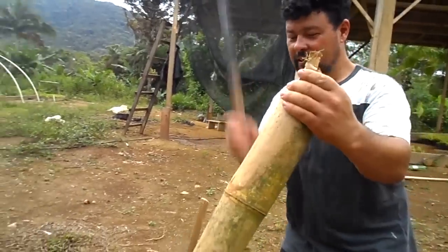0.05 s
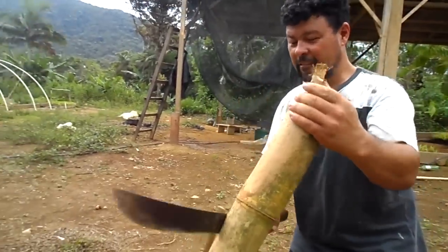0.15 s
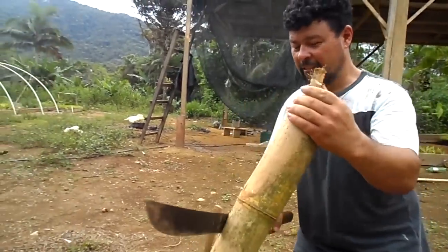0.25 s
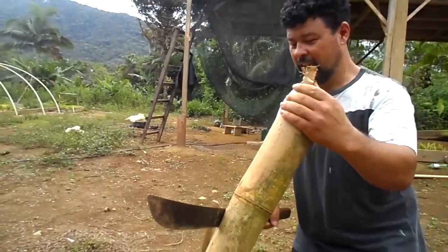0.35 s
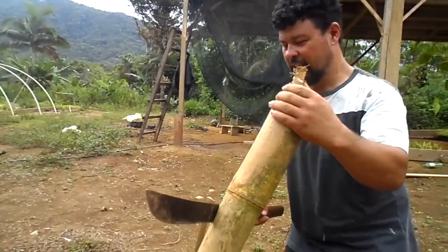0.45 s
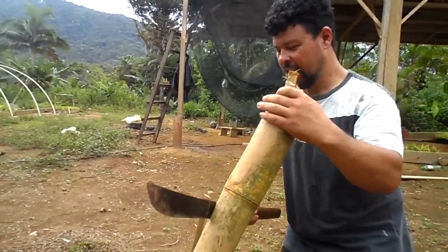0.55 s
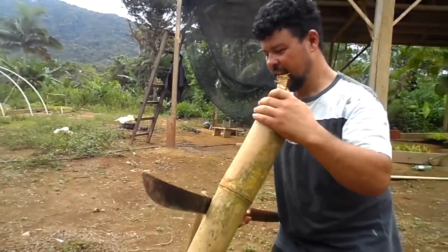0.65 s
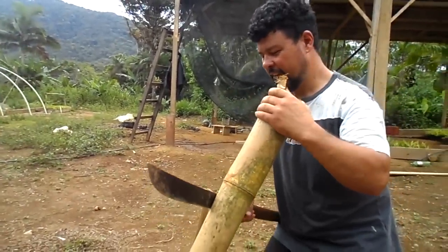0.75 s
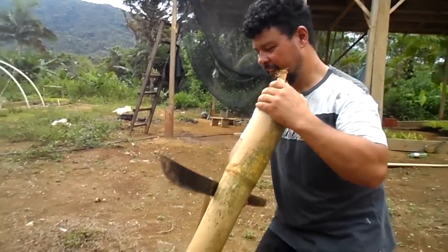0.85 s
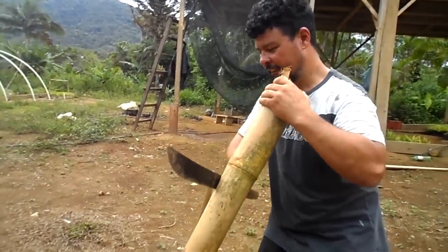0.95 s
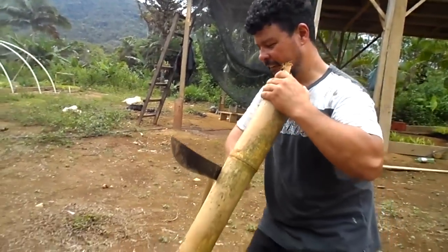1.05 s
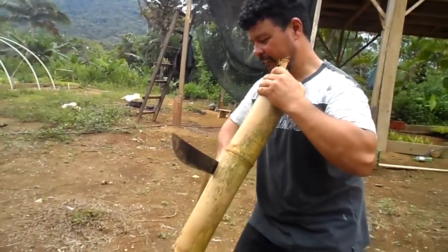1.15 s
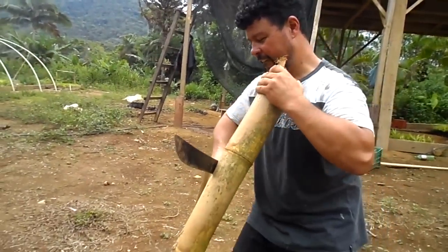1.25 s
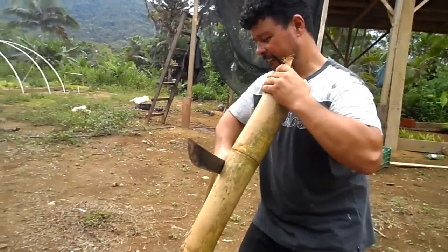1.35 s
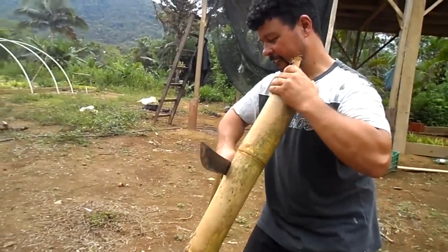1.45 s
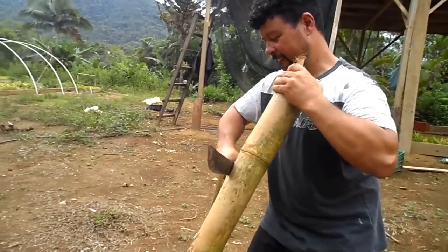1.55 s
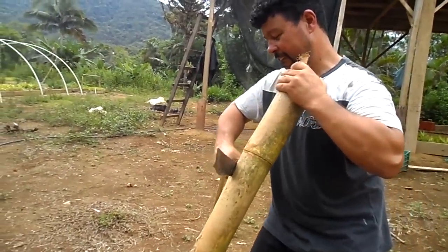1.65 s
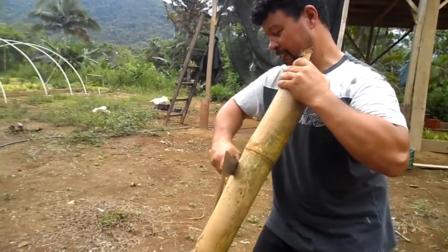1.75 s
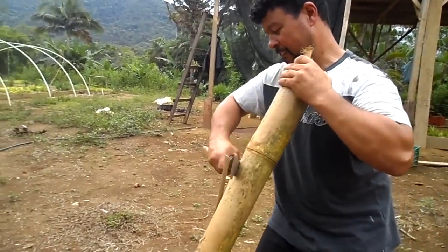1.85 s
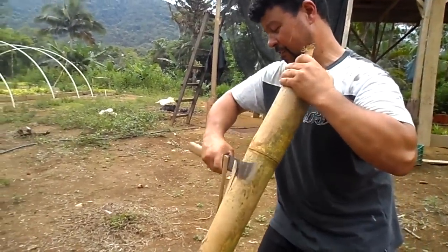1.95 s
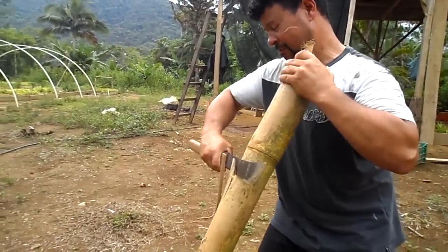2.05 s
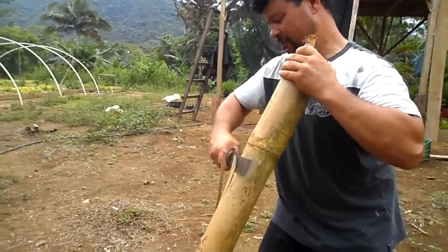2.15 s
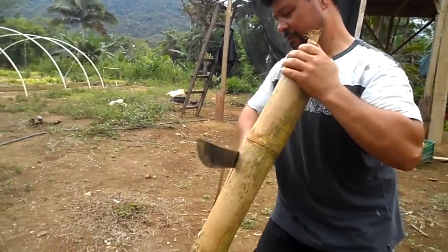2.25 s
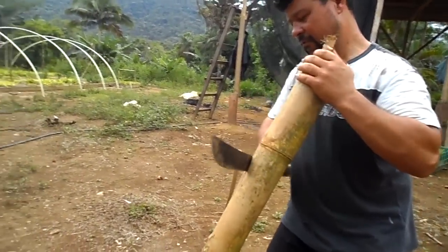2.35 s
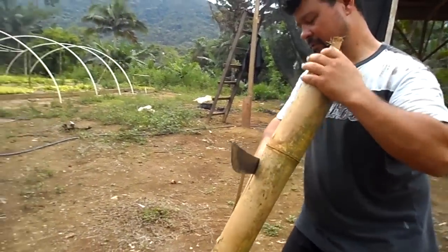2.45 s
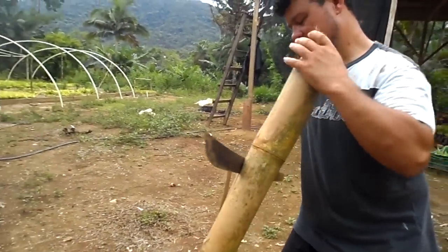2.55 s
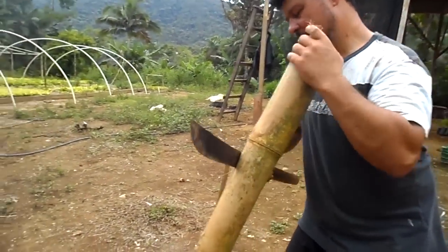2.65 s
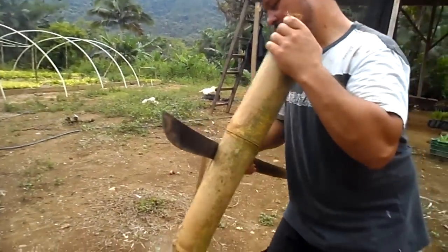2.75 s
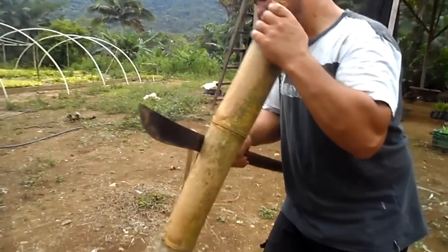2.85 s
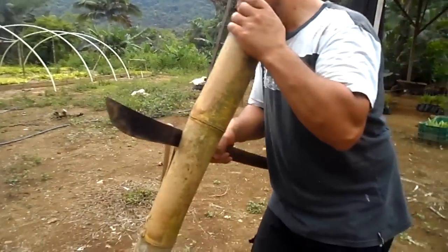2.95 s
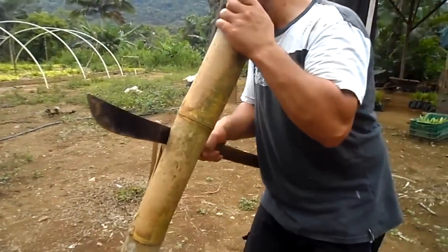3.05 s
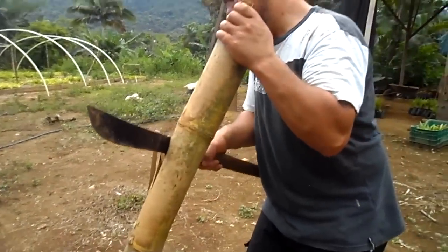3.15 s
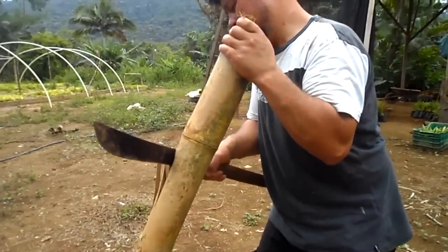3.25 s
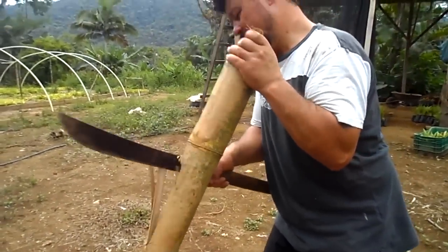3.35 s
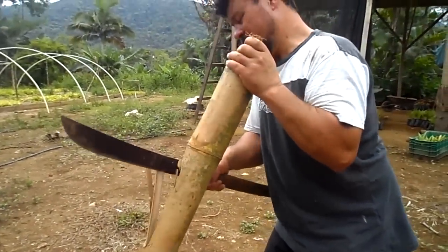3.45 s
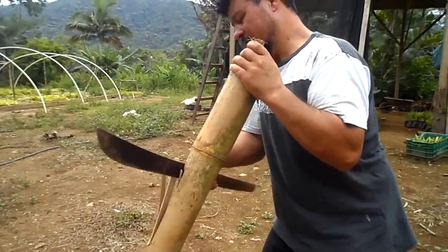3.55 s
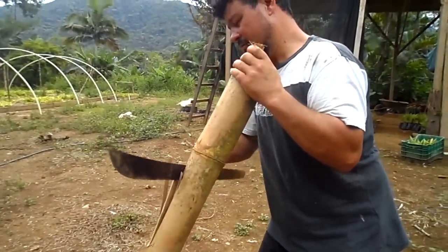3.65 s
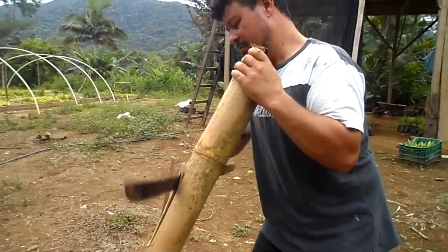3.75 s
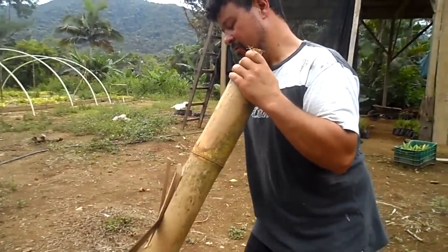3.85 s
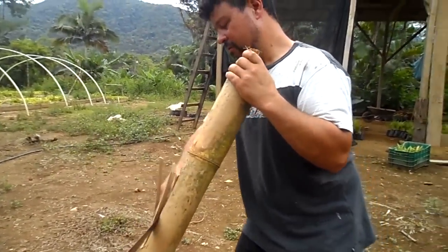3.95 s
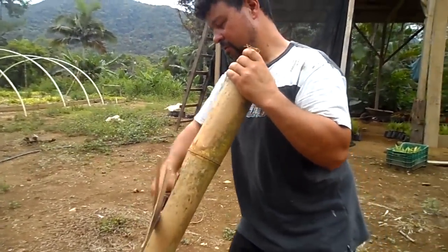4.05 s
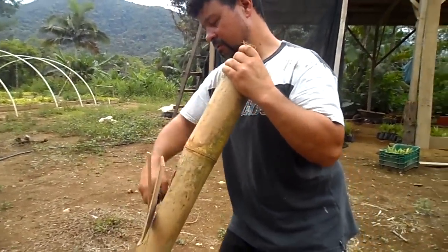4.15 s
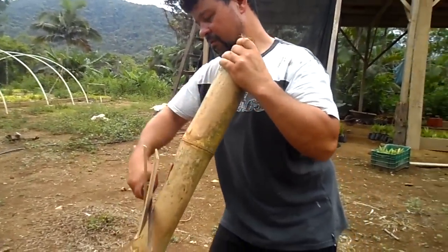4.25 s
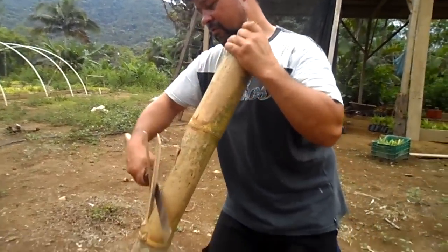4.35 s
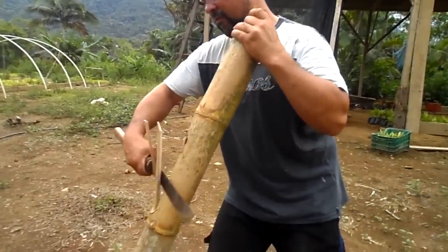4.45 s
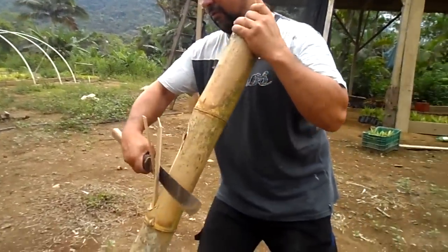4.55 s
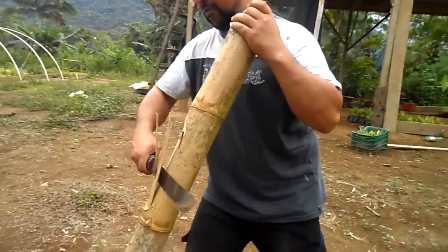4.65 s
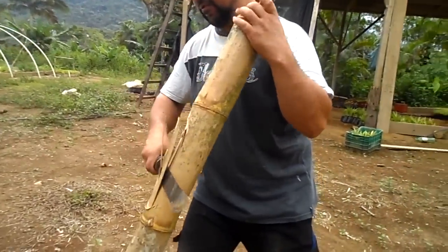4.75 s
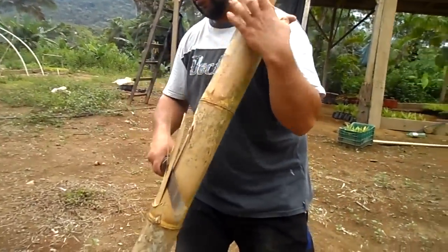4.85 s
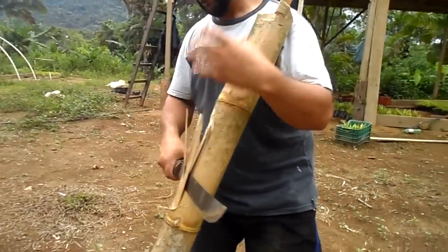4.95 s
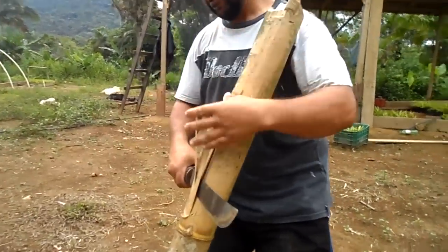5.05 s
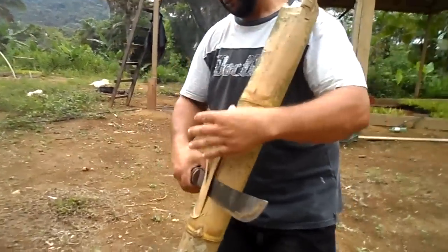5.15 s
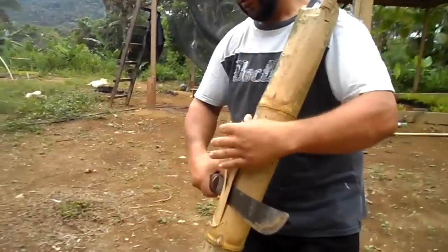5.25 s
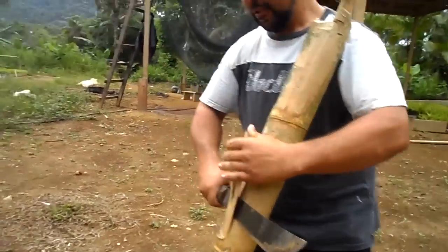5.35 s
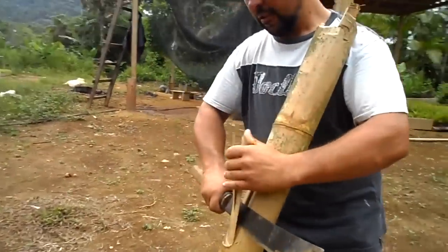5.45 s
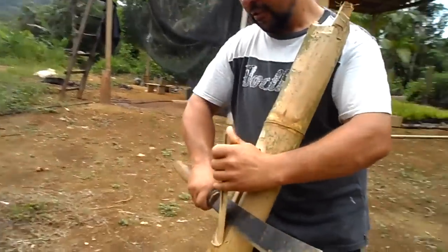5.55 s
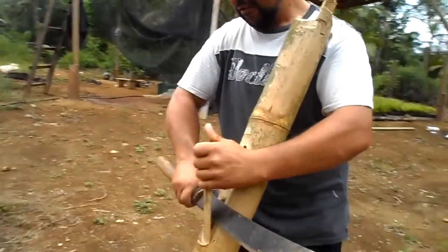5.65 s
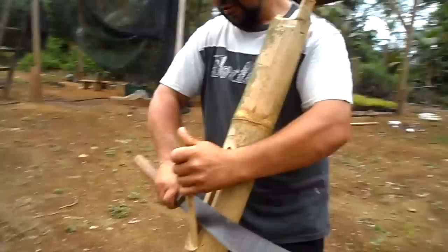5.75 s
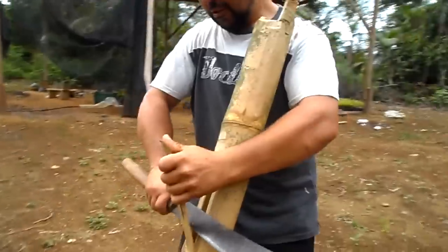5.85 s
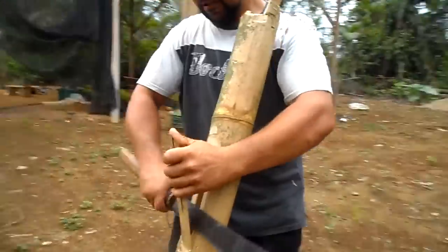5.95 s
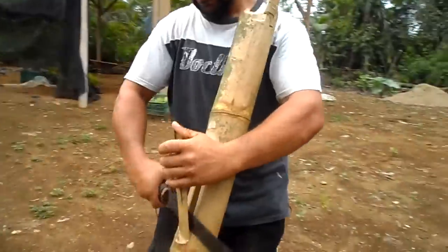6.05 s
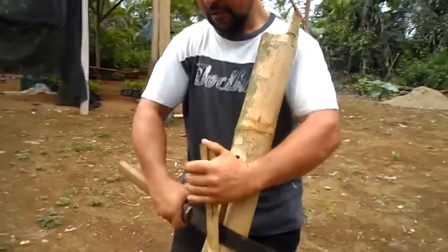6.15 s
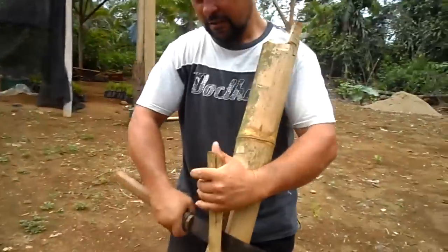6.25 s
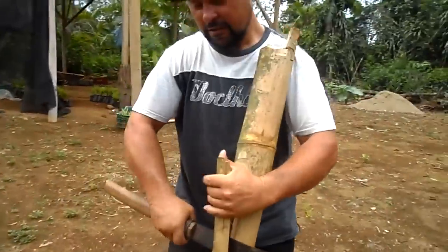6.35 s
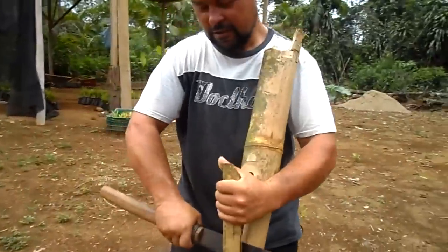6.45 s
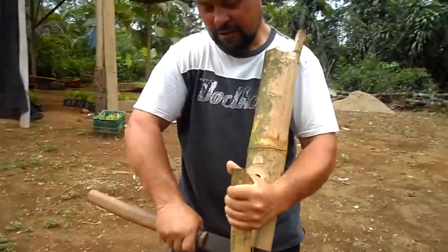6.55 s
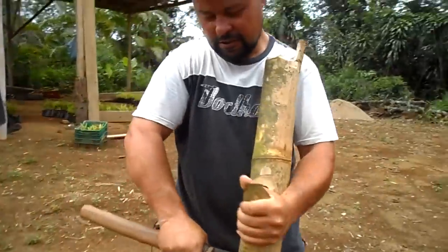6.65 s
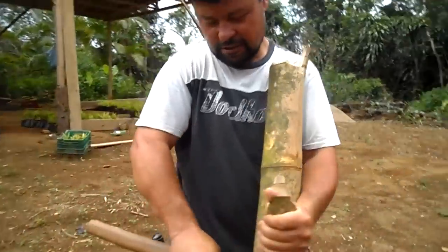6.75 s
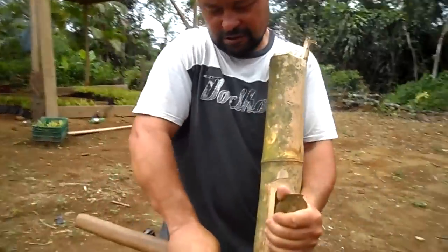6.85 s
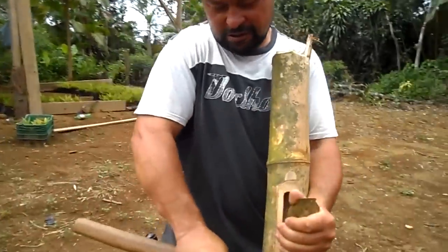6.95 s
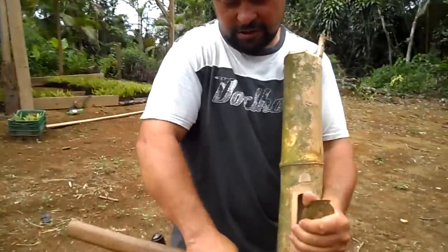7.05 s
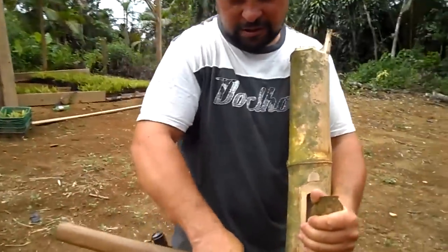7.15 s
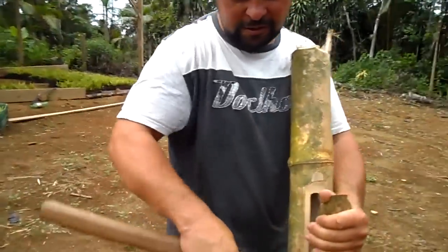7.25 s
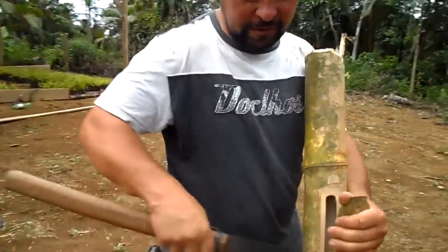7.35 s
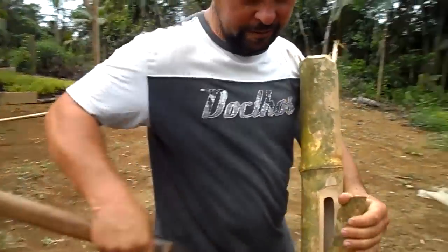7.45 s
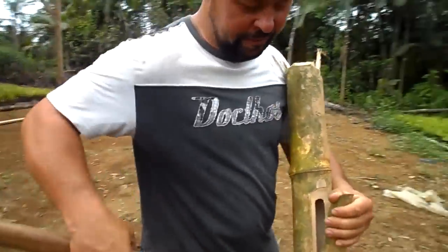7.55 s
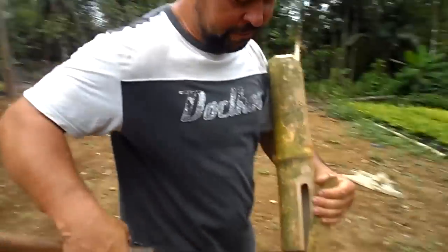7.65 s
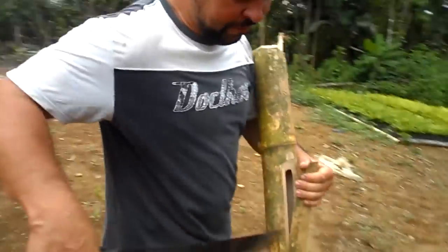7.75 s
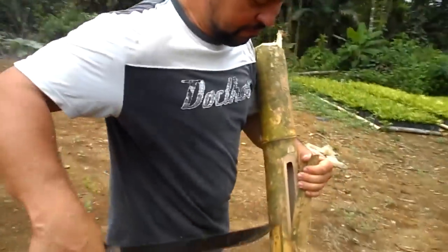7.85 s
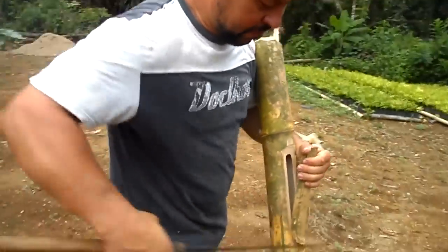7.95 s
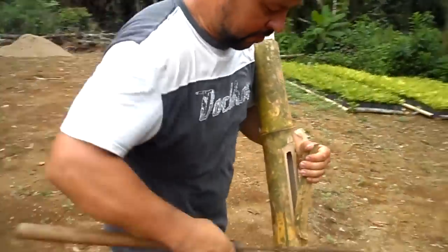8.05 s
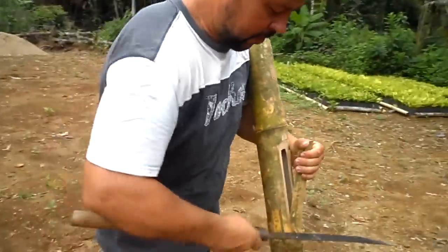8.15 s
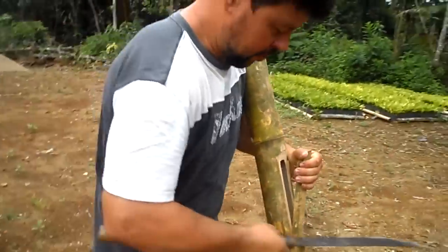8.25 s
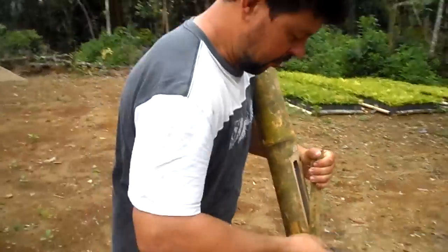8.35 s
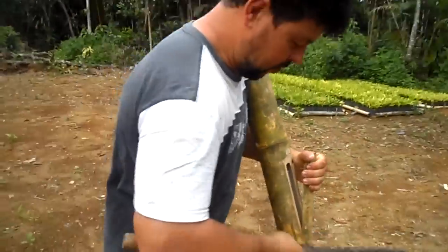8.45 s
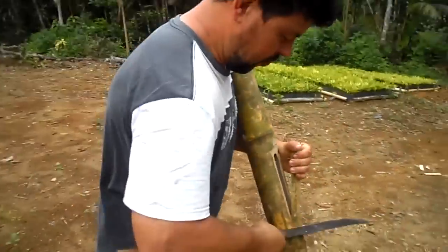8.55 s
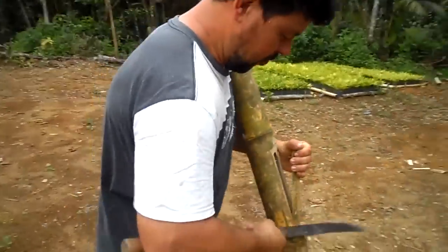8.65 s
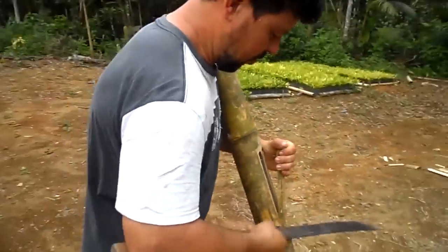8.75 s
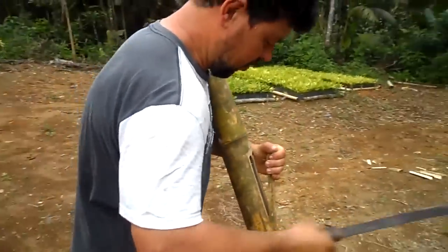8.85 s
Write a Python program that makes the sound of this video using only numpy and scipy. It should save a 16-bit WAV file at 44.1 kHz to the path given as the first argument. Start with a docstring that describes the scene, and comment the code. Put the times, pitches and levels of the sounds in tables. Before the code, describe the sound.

A quiet open yard, close microphone, very little echo: soft breeze and a barely audible low hum throughout. At 0.3 s a short rising whistle of the blade runs into a sharp, bright, splintery crack on bamboo, followed by faint rubbing. From about 1.2 s fibres tick, with one strong snap at 1.6, thickening into a dense dry crackle around 2.1 and ending by 2.3. Light taps and tiny rising bird chirps come near 2.5 and 3.0. Sharp snaps at 3.4 lead to the loudest blow at 3.54, a full hollow woody knock with a quick second knock and scrape. From 4 to 6 s only sparse ticks, faint rubs and chirps. A clearer woody tap falls at 6.2. Around 7.4-7.9 the blade drags and scrapes with a thin steely edge, amid small knocks. At 8.7 a final hollow chop lands and dies quickly.

```python
"""A machete chops a thick green bamboo pole outdoors and levers a strip out of it.
Blows ring the decaying modes of wall, cavity and steel; fibres snap as spikes that ring the strip;
hands and blade rub the pole as random slips driving its modes. Small birds chirp as gliding narrow noise.
A quiet breezy yard adds shaped noise, a faint low hum and sparse reflections."""
import sys
import numpy as np
from scipy import signal
from scipy.fft import rfft, irfft
from scipy.io import wavfile
from scipy.ndimage import uniform_filter1d

SR = 44100
rng = np.random.default_rng(int(sys.argv[2]) if len(sys.argv) > 2 else 0)


def waveform_to_disk(signal):
    """Save audio, clipped to [-1, 1], as 16-bit WAV at the path in sys.argv[1]."""
    frames = np.transpose(np.atleast_2d(signal))
    scaled = np.clip(frames, -1, 1) * 32767
    samples = np.round(scaled).astype(np.int16)
    wavfile.write(sys.argv[1], SR, samples)


N = 392490  # samples

# spectrum of the breeze: (frequency [Hz], relative density [dB per Hz])
AIR_SPECTRUM = [(8.8, -31), (15, -3), (65, -9.5), (97, -11), (174, -19.5), (382, -18), (430, -27.5),
                (512, -18.5), (559, -22.5), (972, -24.5), (1060, -26), (1850, -27), (16000, -37.5)]
# background swells: (time [s], level [dB], extra level below about 1 kHz [dB])
AIR_SWELL = [(0, -60.5, 2.5), (.32, -63, 4), (.47, -66.5, 2), (.8, -69, 3), (1.5, -68.5, 0.5),
             (2.05, -66, 2.5), (2.6, -65.5, 2.5), (3.401, -64, 0.5), (3.75, -65.5, 4), (4.3, -67.5, 2),
             (5.2, -66.5, 6), (6.049, -65.5, 2), (6.4, -66, 4.5), (7.35, -65.5, 4), (7.6, -64, 1.5),
             (8.2, -66.5, 3.5), (8.9, -65, 4)]
# low hum: (start [s], end [s], start frequency [Hz], end frequency [Hz], fundamental RMS [dB])
HUM_GLIDES = [(0, .3, 99, 100.6, -71.5), (0.548, 1.149, 107.8, 96.5, -70), (1.47, 2.147, 88, 87.8, -71),
              (2.398, 2.798, 84.5, 91.2, -68), (2.87, 3.5, 90.3, 90.5, -68.5), (3.65, 4.1, 98.8, 99.4, -69),
              (4.3, 5.246, 89.9, 117.1, -70), (5.631, 6.249, 100.2, 104.5, -73),
              (6.4, 7.247, 94.86, 114.4, -70), (7.598, 8.45, 104.8, 103, -71.5)]
# small birds, and the blade whistling down before the first chop:
# (start [s], end [s], start frequency [Hz], end frequency [Hz], level [dB], noise width [Hz])
CHIRP_GLIDES = [(.275, 0.346, 1295, 3202, -53.5, 353.4), (2.484, 2.5, 1800, 2100, -63, 60),
                (2.489, 2.533, 2490, 4200, -63.5, 100), (2.969, 3.02, 2690, 3040, -62, 90),
                (3.782, 3.822, 5270, 5740, -73.5, 90), (3.809, 3.9, 5800, 5460, -72.5, 60.3),
                (4.96, 5.016, 4410, 3810, -75, 60), (5.459, 5.5, 2190, 4190, -60.5, 100),
                (6.89, 6.93, 7100, 6930, -74.5, 61.3)]
# reflections: (frequency [Hz], T60 [s])
YARD_DECAY = [(200, 0.48), (1000, 0.21), (4000, .24), (12000, 0.22)]
# pass band of the reflections: low edge, high edge [Hz]
ECHO_EDGES_HZ = [850, 7000]
# pole wall modes: (frequency [Hz], level [dB], T60 before grip or damping [s])
POLE_MODES = [(112, -7.5, 0.23), (229, -7, 0.048), (438.5, 2, .07), (594, -3, 0.092), (680, -4, 0.078),
              (808, -8.5, 0.089), (942, -6, 0.059), (1169, -4, 0.055), (1277, -4, 0.054), (1438, 0, .05),
              (1725, -14, .04), (2320, -6, 0.021), (2820, -13.5, 0.027), (3003, -10.5, 0.047),
              (3820, -8.5, 0.043)]
# steel blade modes: (frequency [Hz], level [dB], T60 before damping [s])
BLADE_MODES = [(1760, 2.5, 0.11), (4400, -15.5, 0.36), (4860, -1, 0.63), (5260, 0, 0.19), (5590, 3.5, .2),
               (5900, -5.5, .15), (6280, -12, 0.12), (11300, -28, .1)]
# layers of the hard chops (crack, body and extra groups of wall modes, and later knocks):
# (time [s], wall level [dB], most excited frequency [Hz], spread [octaves], place along the pole [0-1],
# T60 factor of the grip, cavity level [dB], crack level [dB], blade level [dB], contact time [s],
# thump level [dB], crack tilt [dB per octave], crack T60 [s])
CHOP_LAYERS = [(.327, -25.5, 2187, 2.3, 0.91, .99, -29, -6.5, -70.5, 0.0001, -28.5, -2.5, .02),
               (.329, -13, 1165, 0.5, .95, 1.3, -45.5, -13, -61, 0.005, -17.5, -8, 0.051),
               (.332, -26, 110.6, .28, 1, 1.92, -61, -58, -87, 0.0044, -49, -2.5, .04),
               (3.541, 0, 457, 0.65, 0.43, 0.71, -43.5, -12.5, -59.5, 0.0028, -20.5, -1.5, 0.022),
               (3.544, -11, 1591, 0.25, .89, 0.65, -60.5, -32, -90, .0039, -28, -4, 0.076),
               (3.5851, -6.5, 640, 0.59, .34, .3, -40.5, -32, -89.5, 0.0024, -32, -8.5, .055),
               (3.584, -24, 1700, .3, .89, .8, -70, -60, -90, .003, -70, -7, .03),
               (3.604, -26, 560, 0.72, 0.5, 0.6, -51, -29, -90, 0.0035, -50, -7.5, 0.017),
               (8.7003, -23, 2480, 0.81, 1, 1.01, -39, -15, -91, .0005, -17.5, -5.5, 0.02),
               (8.7033, -9.5, 1160, 0.18, 0.97, .9, -57, -48, -90, 0.0021, -59.5, -1, .03),
               (8.7034, -5, 720, 1.2, .96, 0.69, -23, -31.5, -90, 0.0066, -10.5, -3.5, .11)]
# light taps of hand or blade: (time [s], wall level [dB], most excited frequency [Hz], spread [octaves],
# place [0-1], T60 factor, cavity level [dB], crack level [dB], blade level [dB], contact time [s])
LIGHT_TAPS = [(2.092, -51, 300, .5, .97, 0.73, -52, -70, -90, .004),
              (2.141, -46, 300, 0.57, 1, .8, -54.5, -68, -90, 0.0036),
              (2.469, -38, 239, .36, 0.95, .8, -55, -56.5, -90, 0.0016),
              (2.544, -45, 606, 1.2, 1, .33, -67.5, -54, -90, 0.0012),
              (2.939, -43, 1010, 1.3, 0.8, 0.23, -68, -40.5, -91, 0.0004),
              (4.94, -44.5, 431, 0.65, 0.43, 0.98, -65, -69, -90, .0043),
              (5.517, -43.5, 440, .39, 0.4, 1, -73, -66, -90, 0.0045),
              (5.706, -48.5, 238, 0.44, 0.95, 0.88, -57.5, -48.5, -88, .002),
              (6.108, -36, 578, 0.43, 0.39, .27, -70.5, -65, -90, 0.0015),
              (6.1955, -19, 790, 1.1, 0.31, 0.81, -56.5, -38, -80, 0.0063),
              (6.283, -39.5, 580, 0.39, 0.31, 0.91, -70, -63, -89, .0034),
              (7.67, -26.5, 695, 0.42, .92, 0.48, -56, -39.5, -75, 0.0021),
              (7.792, -43, 773, 0.58, .3, 0.31, -74.5, -55, -89.5, 0.0023),
              (7.902, -28.5, 600, 0.56, 0.32, 0.66, -63, -56, -70, 0.0042),
              (7.93, -46, 903, 0.67, 0.04, 0.45, -66, -62, -60.5, .0019)]
# hands and blade rubbing the pole, silent where end precedes start:
# (start [s], peak [s], end [s], hollow, woody, gritty rub level at the peak [dB])
RUB_STROKES = [(.36, 0.39, 0.65, -73, -68, -65), (.66, 0.682, 0.74, -67, -62, -71.5),
               (0.999, 1.028, 1.09, -63, -72.5, -80.5), (2.69, 2.737, 2.74, -55.5, -59, -62.5),
               (2.946, 2.957, 3.56, -76, -72, -65), (3.202, 3.25, 3.25, -56, -63.5, -70.5),
               (3.404, 3.406, 3.43, -65, -50, -59), (3.46, 3.51, 3.6, -70, -72, -63.5),
               (3.549, 3.568, 3.577, -26, -34, -43), (3.592, 3.607, 3.645, -36, -43, -53),
               (3.68, 3.686, 3.7, -62, -70, -63), (3.705, 3.71, 3.79, -61, -61.5, -66.5),
               (3.971, 4.062, 4.095, -55.5, -59, -59), (4.96, 5.044, 5.05, -60.5, -63, -73),
               (5.252, 5.281, 5.41, -57, -59.5, -66), (5.714, 5.717, 5.84, -73, -61, -69),
               (5.871, 5.92, 5.97, -72.5, -67, -63), (6.02, 6.04, 6.13, -66.5, -64, -69),
               (6.125, 6.14, 6.15, -58, -72, -76), (6.151, 6.168, 6.1, -55, -71, -70),
               (6.221, 6.235, 6.25, -48, -56, -61), (6.277, 6.285, 6.31, -54, -70, -58),
               (6.598, 6.632, 6.67, -63, -67.5, -63), (6.906, 6.918, 6.92, -66.5, -65, -59.5),
               (7.419, 7.444, 7.5, -52, -49.5, -55), (7.455, 7.474, 7.5, -56, -52, -57.5),
               (7.51, 7.53, 7.46, -59, -60, -54.5), (7.533, 7.586, 7.65, -57, -61, -58.5),
               (7.632, 7.647, 7.82, -62, -70, -59.5), (7.683, 7.686, 7.74, -52, -54.5, -70),
               (7.716, 7.724, 7.75, -55, -62, -73), (7.874, 7.894, 7.91, -51, -54, -58),
               (7.9, 7.927, 7.92, -48.5, -48, -54.5), (7.937, 7.947, 8.0, -65, -62.5, -73),
               (8.241, 8.258, 8.285, -65.5, -68.5, -71.5), (8.493, 8.508, 8, -60.5, -71.5, -75),
               (8.775, 8.802, 8.96, -63, -67, -64.5)]
# blade dragged along the edge in stuttering pulls: (time [s], drive level [dB])
BLADE_DRAG = [(7.41, -76), (7.44, -51.5), (7.475, -54), (7.505, -66), (7.525, -53), (7.586, -53.5),
              (7.625, -60), (7.65, -54), (7.68, -59), (7.72, -76)]
# half-split strip modes: (frequency [Hz], level [dB], T60 [s])
STRIP_MODES = [(1144, -6.5, .06), (1596, -9, 0.059), (2240, -11.5, 0.038), (2765, -12, 0.005),
               (3540, -7.5, 0.016), (4240, -0.5, 0.013), (5090, -1, 0.011), (6317, -4, 0.016),
               (7540, -3.5, 0.0073), (7960, -13.5, 0.0029), (10160, -3.5, 0.0038), (12000, -3.5, 0.0044),
               (14200, -15, 0.0017)]
# fibres snapping: (time before SNAP_DELAY_S [s], level [dB], tilt [dB per octave])
FIBRE_SNAPS = [(1.1823, -44.5, -1), (1.5578, -44.5, -4), (1.5953, -21.5, 3.5), (1.6316, -38, 2),
               (1.6637, -36.5, 2), (1.705, -41.5, 2), (1.7641, -34, 1), (1.807, -42, -.5),
               (1.842, -39, 1.5), (1.888, -34, 1), (1.9423, -34.5, 1), (1.9796, -34.5, 1),
               (2.0148, -36, -2), (2.0386, -40, -3), (2.0577, -33.5, 0), (2.0895, -30, 1),
               (2.1071, -27.5, 0), (2.1162, -26, -4), (2.1284, -26, 0), (2.138, -24.5, -1),
               (2.154, -27, -10), (2.162, -28, -1), (2.1677, -30, -7), (2.172, -34, 7), (2.18, -30.5, -18),
               (2.187, -30.5, 0), (2.1992, -30.5, -3), (2.2173, -35, -2), (2.3024, -42, -3),
               (2.9525, -44, -8), (2.9871, -49, -5), (3.002, -49, 0), (3.0355, -49, -7),
               (3.0958, -35.5, -1), (3.2064, -47.5, -3), (3.26, -41, -1), (3.4004, -25.5, -2.5),
               (3.411, -39.5, 5), (3.4293, -36, 7.5), (3.4477, -44, 4), (3.532, -36, 5), (3.559, -28, 3),
               (3.567, -26, 2), (3.5922, -30, -8), (4.2053, -38, 4.5), (4.3003, -42, 3.8),
               (4.6026, -41.5, 3), (4.6482, -49.5, 5), (4.6806, -46, 7), (5.2445, -44, -5.5),
               (5.637, -49, -.5), (5.695, -50.5, -3), (5.7066, -43, -3), (5.7492, -48, -10),
               (5.7876, -40, -10.5), (5.8376, -45.5, -7), (5.9069, -45.5, 2), (5.919, -51.5, 0),
               (5.9628, -46.5, 3.5), (6.0038, -39, 0.5), (6.0677, -39.5, 3.5), (6.0755, -46, 4),
               (6.337, -50.5, 3), (7.0328, -45.5, -9), (7.0994, -46, 3.5)]
# strip modes below 2.5 kHz: (time [s], level [dB])
STRIP_LOW_LEVEL = [(1.2, -10.5), (1.65, -11.5), (1.85, -6), (2.11, 0), (2.3, 8.5), (3.0, -6), (4.3, -8.5),
                   (4.6, 4), (5.3, -2.5), (5.8, 3.5), (7.1, -1)]

HUM_THIRD_DB = -13
ECHO_DB = -29
CAVITY_HZ, CAVITY_T60_S = 302, 0.25  # air shut between two nodes of the cane
THUMP_HZ, THUMP_T60_S = 183, 0.053  # the whole pole jolts
TAP_THUMP_REL_WALL_DB, TAP_TILT_DB_PER_OCT, TAP_CRACK_T60_S = -25.5, -7, 0.037
RUB_RISE_DB, RUB_FALL_DB, RUB_UNEVEN_DB = 11.5, 19.5, 2.5  # uneven: RMS wobble of pressure
STRIP_DRIFT = .008  # relative standard deviation of mode frequency, snap to snap
SNAP_DELAY_S = .0011  # fixed delay from the listed time to the spike
# faint fibres giving while the strip is handled
TICKS_PER_S, TICKS_FROM_S, TICKS_TO_S, TICK_FLOOR_DB, TICK_SPREAD_DB = 3.6, 2.9, 7.2, -55.5, 3
EDGE_HZ = 16300  # top of the output band


def amp(db):
    """Decibels to linear gain."""
    return 10 ** (np.asarray(db) / 20)


def evened(x):
    """Scales to unit RMS."""
    return x / np.sqrt(np.mean(x ** 2) + 1e-20)


def on_log_hz(points, hz):
    """Joins spectrum points on a log-frequency axis."""
    f, value = np.transpose(points)
    return np.interp(np.log(hz + 1), np.log(f + 1), value)


def add(mix, start_s, sound):
    """Adds a sound in place, cut at the end of the mix."""
    part = mix[round(start_s * SR):][:len(sound)]
    part += sound[:len(part)]


def ring(hz, gains, t60_s, length_s):
    """Sum of decaying sines started together."""
    t = np.arange(round(length_s * SR))[:, None] / SR
    modes = gains * amp(-60 * t / t60_s) * np.sin(2 * np.pi * hz * t)
    return modes.sum(1)


def tilted(x, tilt_db_per_oct, low_hz, top_hz):
    """Slopes the spectrum about 3 kHz and rolls off below low_hz and above top_hz."""
    hz = np.fft.rfftfreq(len(x), 1 / SR) + 1
    edges = (1 + (low_hz / hz) ** 4) * (1 + (hz / top_hz) ** 4)
    slope = amp(tilt_db_per_oct * np.log2(hz / 3000))
    return irfft(rfft(x) * slope / edges, len(x))


def level(points):
    """Gain through (time [s], level [dB]) points, tapered at the ends, silent outside."""
    out = np.zeros(N)
    time_s, db = np.transpose(points)
    t = np.arange(time_s[0], time_s[-1], 1 / SR)
    add(out, time_s[0], amp(np.interp(t, time_s, db)) * signal.windows.tukey(len(t), .15))
    return out


def air():
    """Distant leaves and breeze: random spectra with drifting patches."""
    frames, hz = N // 256 + 5, np.fft.rfftfreq(1024, 1 / SR)
    real, imag, patches = rng.standard_normal((frames, 513, 3)).T
    patches = uniform_filter1d(patches, 12, 0)
    patches = evened(uniform_filter1d(patches, 14, 1))
    time_s, db, low_db = np.transpose(AIR_SWELL)
    t = np.arange(frames) * 256 / SR
    # weight of the extra low level, itself fading below 150 Hz
    low = 1 / (1 + (hz[:, None] / 1200) ** 2) / (1 + (150 / (hz[:, None] + 1)) ** 2)
    field_db = on_log_hz(AIR_SPECTRUM, hz)[:, None] + np.interp(t, time_s, db)
    field_db = field_db + low * np.interp(t, time_s, low_db) + 0.94 * patches
    spectra = (real + 1j * imag) * amp(field_db + 6.0)
    return signal.istft(spectra, nperseg=1024, noverlap=768)[1][:N]


def hum():
    """A sine with a weak third harmonic glides through each stretch."""
    out = np.zeros(N)
    for start_s, end_s, start_hz, end_hz, db in HUM_GLIDES:
        hz = np.linspace(start_hz, end_hz, round((end_s - start_s) * SR))
        phase = 2 * np.pi * np.cumsum(hz) / SR
        tone = np.sin(phase) + amp(HUM_THIRD_DB) * np.sin(phase * 3)
        add(out, start_s, amp(db) * np.sqrt(2) * tone * signal.windows.tukey(len(phase), .3))
    return out


def chirp(start_s, end_s, start_hz, end_hz, db, width_hz):
    """A short glide: narrow noise riding on a sweeping sine."""
    t = np.arange(0, end_s - start_s, 1 / SR)
    carrier = np.exp(2j * np.pi * np.cumsum(np.linspace(start_hz, end_hz, len(t))) / SR)
    pole = np.exp(-np.pi * width_hz / SR)
    noise = rng.standard_normal(len(t)) + 1j * rng.standard_normal(len(t))
    fuzz = signal.lfilter([1], [1, -pole], noise)
    glide = (carrier * (1 + 2 * fuzz * np.sqrt(1 - pole))).real
    return amp(db) * evened(glide) * signal.windows.tukey(len(t), .7)


def yard(x):
    """Sparse reflections off ground, posts and roof, each band dying at its own speed."""
    taps = np.zeros(SR // 2)
    at = np.arange(600, len(taps) - 20, 20)
    taps[at + rng.integers(0, 20, len(at))] = rng.choice([-1., 1.], len(at))
    taps *= np.clip((np.arange(len(taps)) / SR - .016) / .03, 0, 1)  # gradual onset
    hz, t, z = signal.stft(taps, SR, nperseg=256)
    decay = amp(-60 * t / on_log_hz(YARD_DECAY, hz)[:, None])
    tail = signal.istft(z * decay, SR, nperseg=256)[1]
    tail = signal.lfilter(*signal.butter(2, ECHO_EDGES_HZ, "band", fs=SR), tail)
    return signal.oaconvolve(x, tail / np.linalg.norm(tail))[:N]


def knock(wall_db, hz, octaves, place, grip, cavity_db, crack_db, blade_db, contact_s, thump_db,
          tilt_db_per_oct, crack_t60_s):
    """The wall rings in the modes the blow reaches; cavity air, splitting wood and steel join in."""
    f, db, t60_s = np.transpose(POLE_MODES)
    reach = np.exp(-.5 * (np.log2(f / hz) / octaves) ** 2)
    shape = np.cos(np.pi * place * np.arange(len(f))) ** 3
    body = amp(wall_db) * ring(f, amp(db) * reach * shape, t60_s * grip, .5)
    body += amp(thump_db) * ring(THUMP_HZ, 0.98, THUMP_T60_S, .5)
    t = np.arange(len(body)) / SR
    body *= 1 - np.exp(-t / abs(contact_s))  # builds up while the blow lands
    cavity = amp(cavity_db) * ring(CAVITY_HZ, 0.99, CAVITY_T60_S, .5) * (1 - np.exp(-t / .006))

    splinters = evened(tilted(rng.standard_normal(len(t)), tilt_db_per_oct, 700, 12000))
    splinters *= 1 - np.exp(-4 * t / abs(contact_s))
    dull = uniform_filter1d(splinters, size=7)
    fade = amp(-60 * t / crack_t60_s) + .02 * amp(-60 * t / (5.3 * crack_t60_s))
    # treble dies first
    crack = amp(crack_db) * fade * (dull + (splinters - dull) * fade ** 0.37)

    f, db, t60_s = np.transpose(BLADE_MODES[1:3])
    return body + cavity + crack + amp(blade_db) * ring(f, amp(db), t60_s, .5)


def grit(slips_per_s, spread_db):
    """Random slips of uneven size."""
    size = amp(spread_db * np.minimum(rng.exponential(1, N), 4)) * rng.standard_normal(N)
    return size * (rng.random(N) < slips_per_s / SR)


def rubbed(drive, modes, damping):
    """Slips ring a set of modes through a unit-energy response."""
    f, db, t60_s = np.transpose(modes)
    body = ring(f, amp(db), damping * t60_s, 0.47)
    return signal.oaconvolve(drive, body / np.linalg.norm(body))[:N]


def strokes(column):
    """Each stroke swells to its peak and fades, with uneven pressure."""
    wobble = uniform_filter1d(rng.standard_normal(N), size=500)
    wobble = evened(uniform_filter1d(wobble, size=500))
    gain = np.zeros(N)
    for start_s, peak_s, end_s, *peaks_db in RUB_STROKES:
        db = peaks_db[column]
        gain += level([
            (start_s, db - RUB_RISE_DB),
            (start_s + np.sqrt(.5) * (peak_s - start_s), db - .2 * RUB_RISE_DB),
            (peak_s, db),
            (peak_s + .5 * (end_s - peak_s), db - 0.5 * RUB_FALL_DB),
            (end_s, db - RUB_FALL_DB)])
    return amp(RUB_UNEVEN_DB * wobble) * gain


def rubbing():
    """Grit under hand or blade: slips ring the wall, fine ones hiss, the drag sings in the steel."""
    hollow = rubbed(strokes(column=0) * evened(grit(1500, 2.5)), POLE_MODES[3:5], .8)
    woody = rubbed(strokes(column=1) * evened(grit(2000, 2.5)), POLE_MODES[6:12], .55)
    gritty = strokes(column=2) * evened(tilted(grit(6000, 2.2), -3.5, 1700, 9000))
    drag = level(BLADE_DRAG)
    sing = np.zeros(N)
    for mode in BLADE_MODES:  # sparse catches, independent for each mode
        catches = drag * evened(grit(250, 3.5))
        sing += amp(mode[1] - 10.0) * rubbed(catches, [mode], 0.49)
    return hollow + woody + gritty + sing


def snap(db, tilt_db_per_oct, low_db):
    """A fibre lets go with a spike; the detuned strip rings briefly with a puff of splinters."""
    f, mode_db, t60_s = np.transpose(STRIP_MODES)
    detune, uneven = rng.standard_normal((2, len(f)))
    colour_db = np.where(f < 2500, low_db, tilt_db_per_oct * np.log2(f / 4000))
    signs = (-1) ** np.arange(len(f))
    gains = amp(mode_db + colour_db + 3.1 * uneven) * signs
    tone = ring(f * (1 + STRIP_DRIFT * detune), gains, t60_s, 0.052)
    t = np.arange(len(tone)) / SR
    spike = -np.cos(2 * np.pi * 8000 * t) * amp(2.5 - 60 * t / .0007)
    puff = evened(tilted(rng.standard_normal(len(t)), tilt_db_per_oct - 5.5, 1900, 13000))
    ring_on = 0.53 * tone / abs(tone).max() + 0.16 * puff * amp(-60 * t / 0.045)
    return amp(db) * (spike + ring_on * (1 - np.exp(-t / .0002)))


def ticks():
    """Faint snaps at random moments: (time before SNAP_DELAY_S [s], level [dB], tilt [dB per octave])."""
    gap, size, tilt = rng.exponential(1, (80, 3)).T
    time_s = TICKS_FROM_S + np.cumsum(gap) / TICKS_PER_S
    db = TICK_FLOOR_DB + TICK_SPREAD_DB * np.minimum(size, 2)
    return np.transpose([time_s, db, 4 * (tilt - 1)])[time_s < TICKS_TO_S]


def scene():
    """Near sounds, their reflections and the background, summed to mono."""
    background = air() + hum()
    near = np.zeros(N)
    for row in CHIRP_GLIDES:
        add(near, row[0], chirp(*row))
    for time_s, *layer in CHOP_LAYERS:
        add(near, time_s, knock(*layer))
    near += rubbing()
    for time_s, db, tilt_db_per_oct in [*FIBRE_SNAPS, *ticks()]:
        low_db = np.interp(time_s, *np.transpose(STRIP_LOW_LEVEL))
        add(near, time_s + SNAP_DELAY_S, snap(db, tilt_db_per_oct, low_db))
    for time_s, wall_db, *tap in LIGHT_TAPS:
        thump_db = wall_db + TAP_THUMP_REL_WALL_DB
        add(near, time_s, knock(wall_db, *tap, thump_db, TAP_TILT_DB_PER_OCT, TAP_CRACK_T60_S))
    return (near + amp(ECHO_DB) * yard(near) + background)[None]


def record(dry):
    """Steep linear-phase low-pass at EDGE_HZ."""
    lowpass = signal.firwin(511, EDGE_HZ, window=("kaiser", 9), fs=SR)
    return signal.oaconvolve(dry, lowpass[None], "same")


dry = scene()
out = record(dry)
waveform_to_disk(out)
```